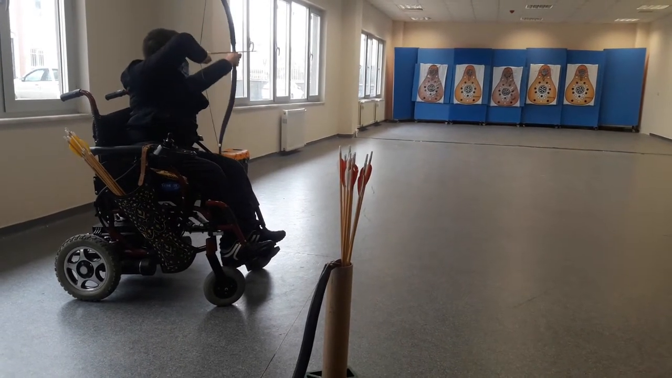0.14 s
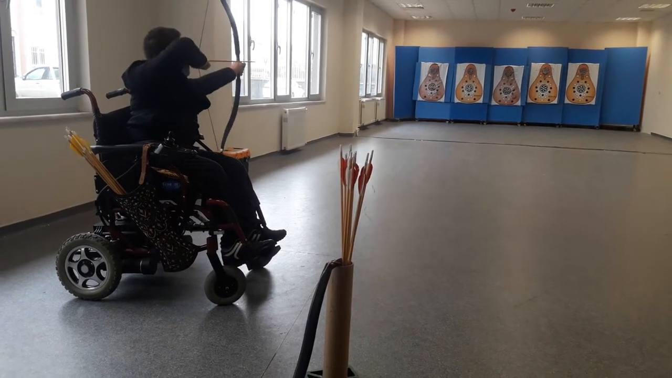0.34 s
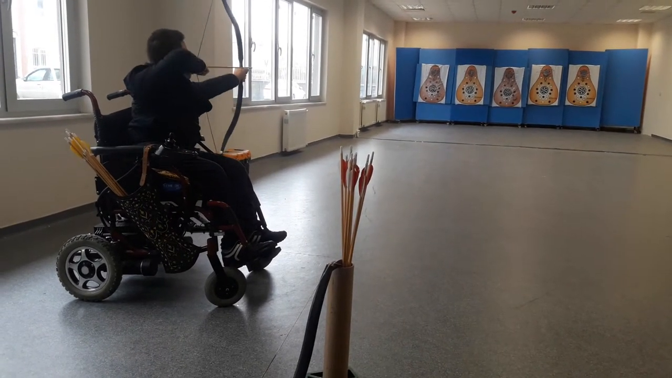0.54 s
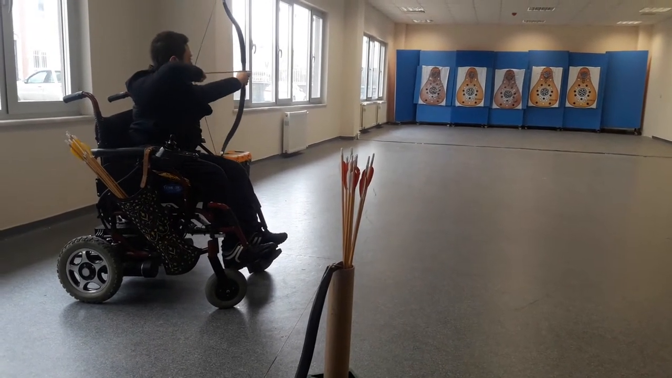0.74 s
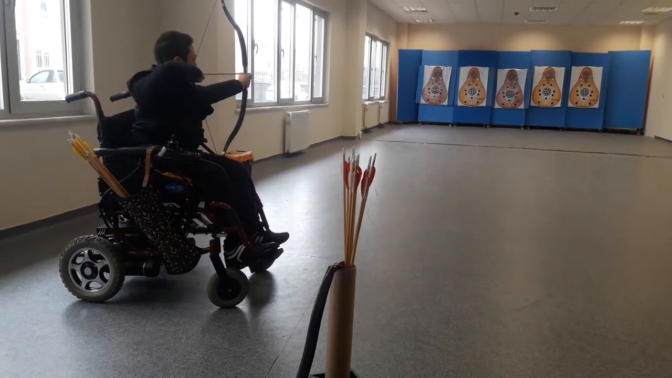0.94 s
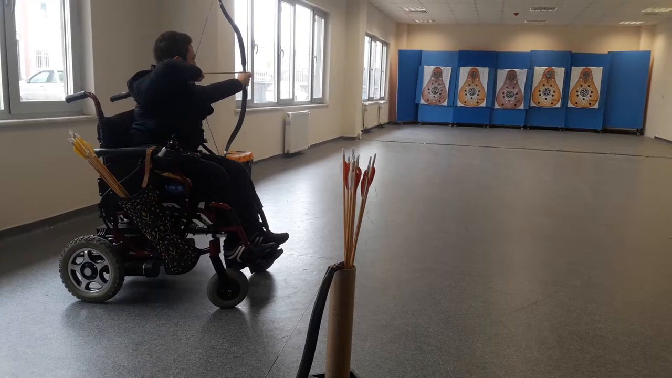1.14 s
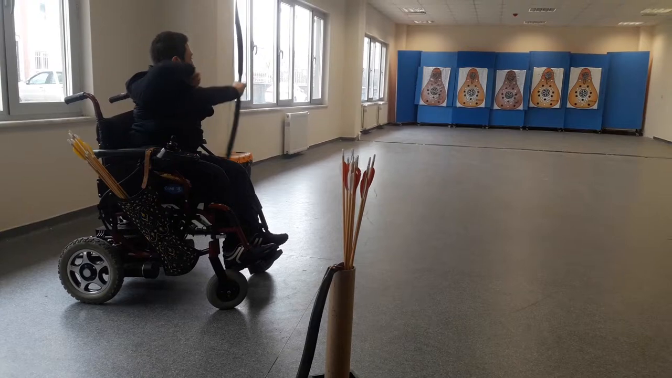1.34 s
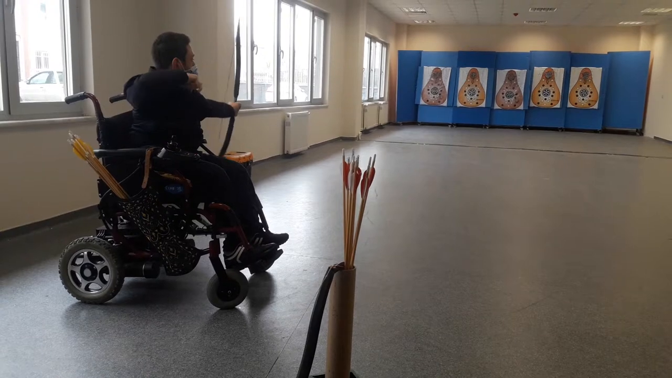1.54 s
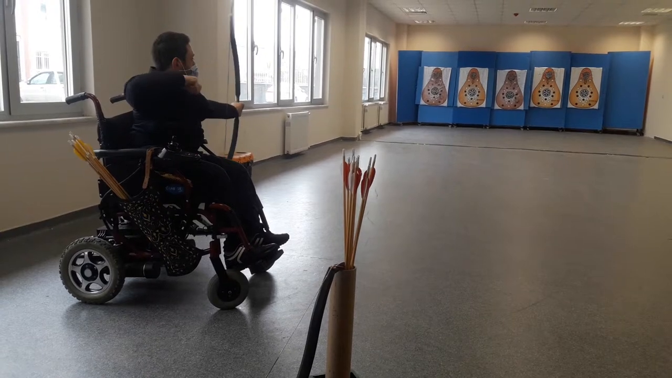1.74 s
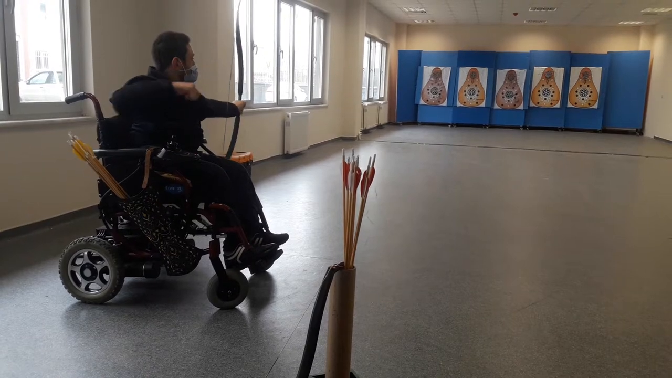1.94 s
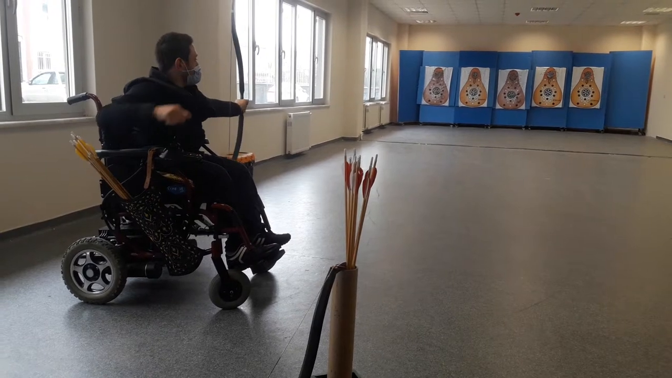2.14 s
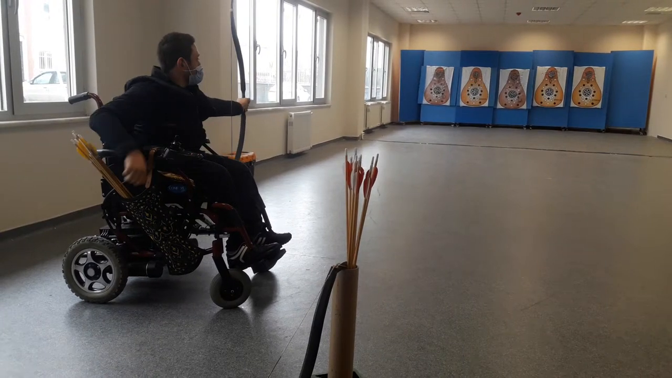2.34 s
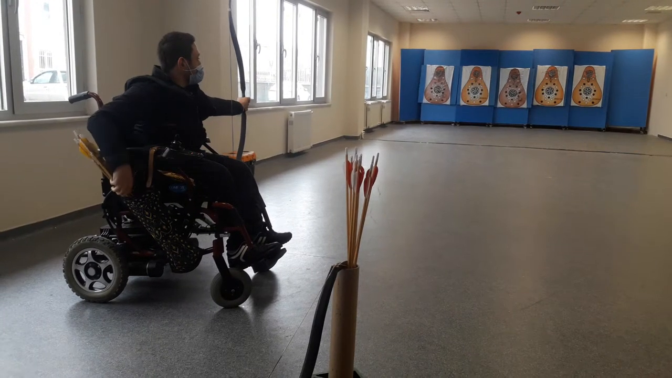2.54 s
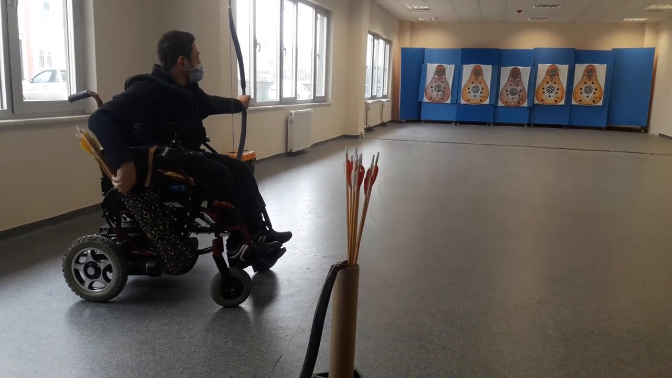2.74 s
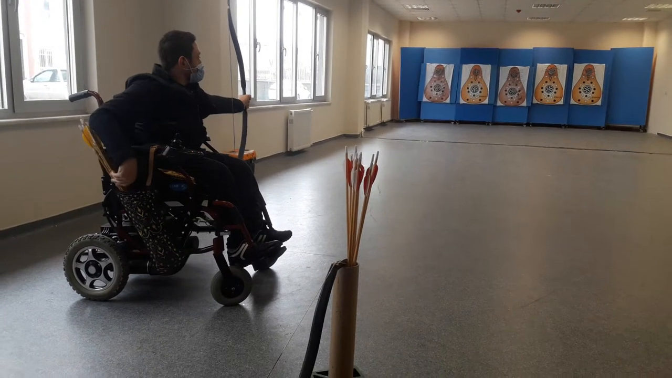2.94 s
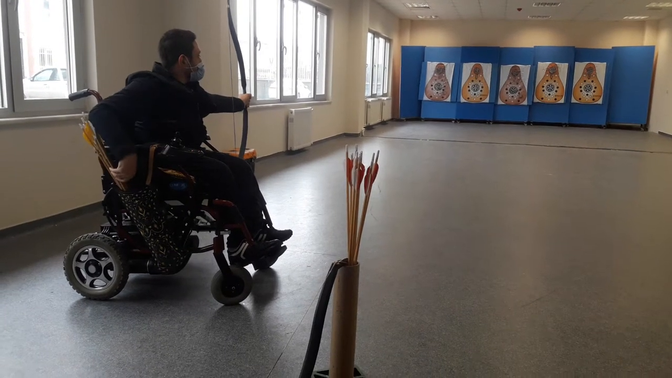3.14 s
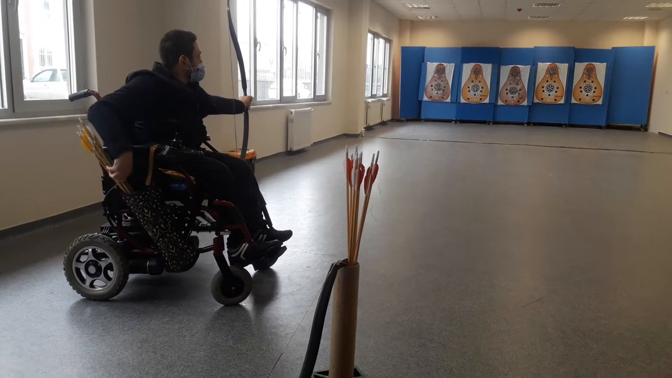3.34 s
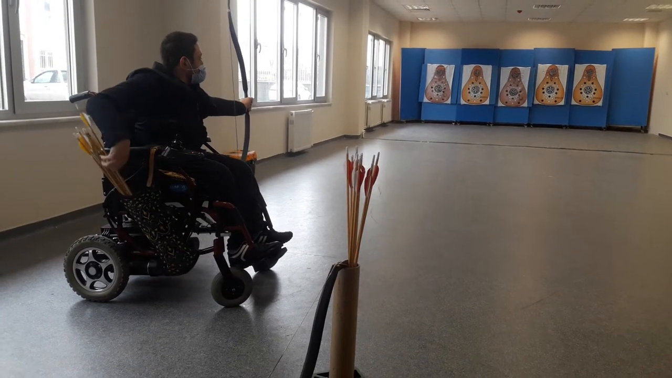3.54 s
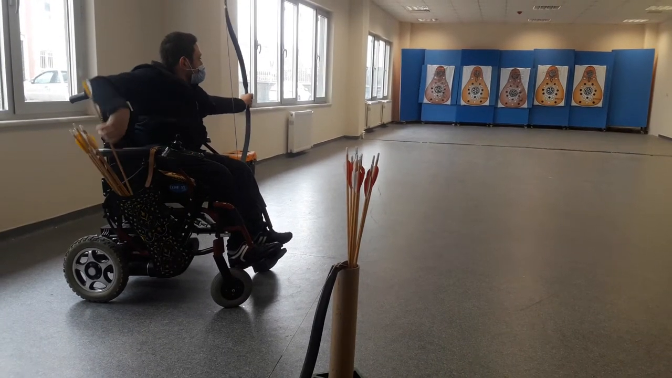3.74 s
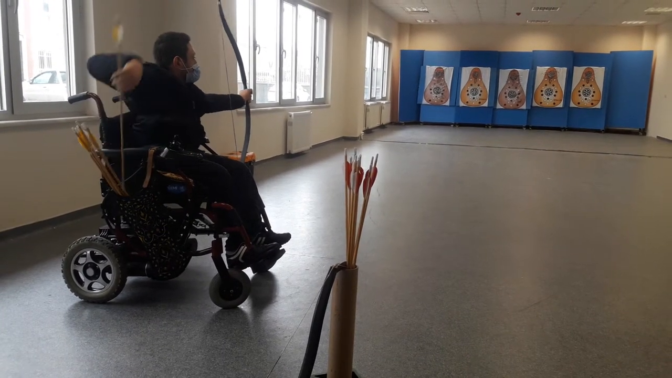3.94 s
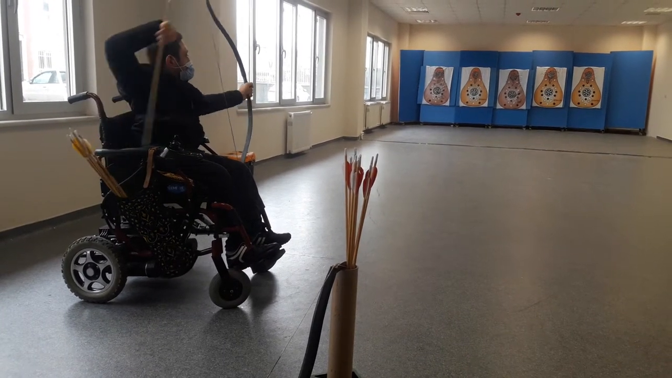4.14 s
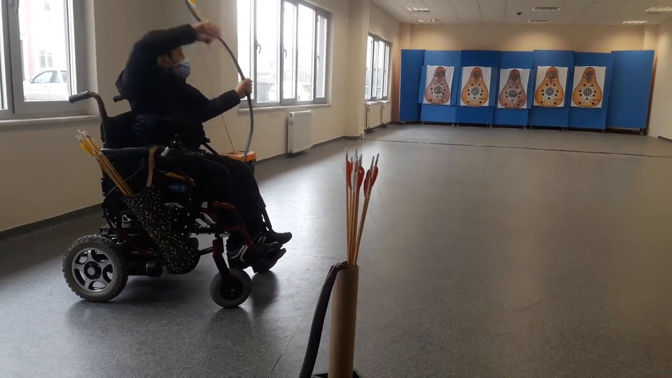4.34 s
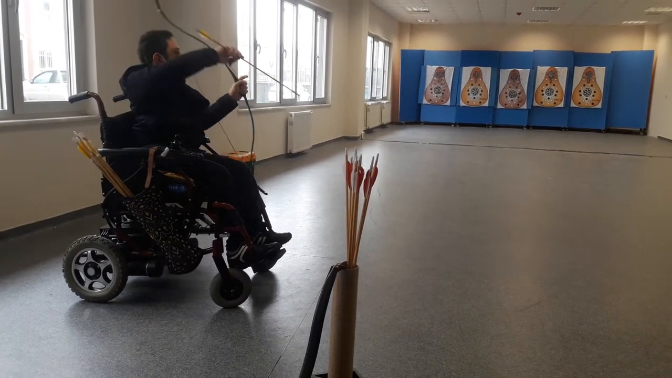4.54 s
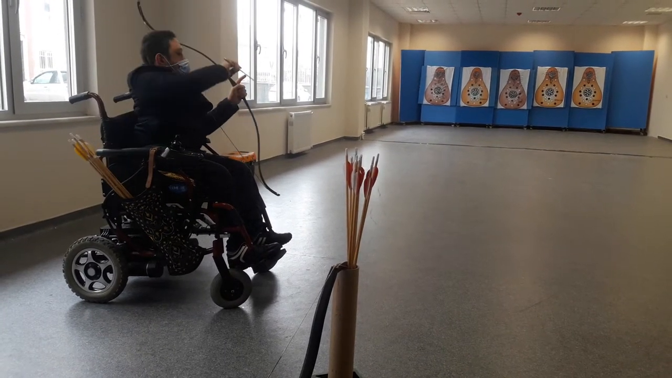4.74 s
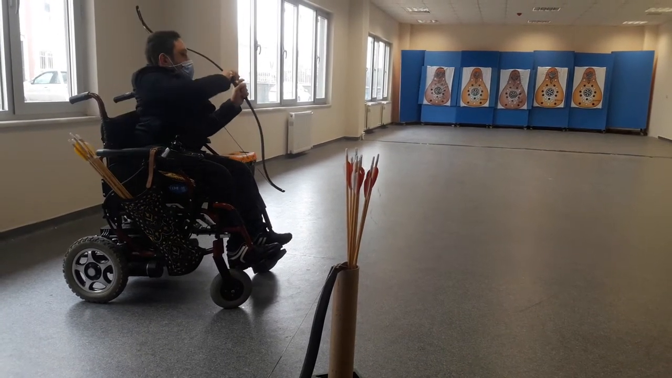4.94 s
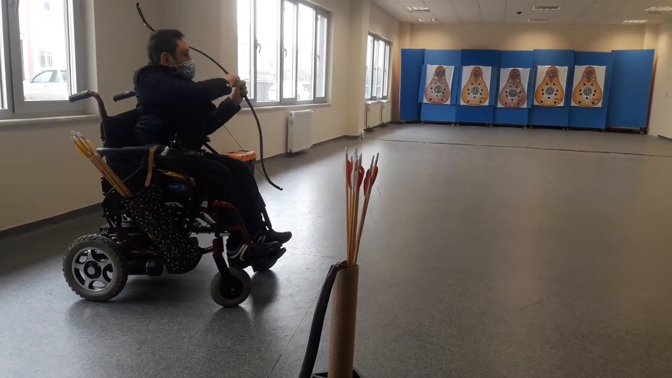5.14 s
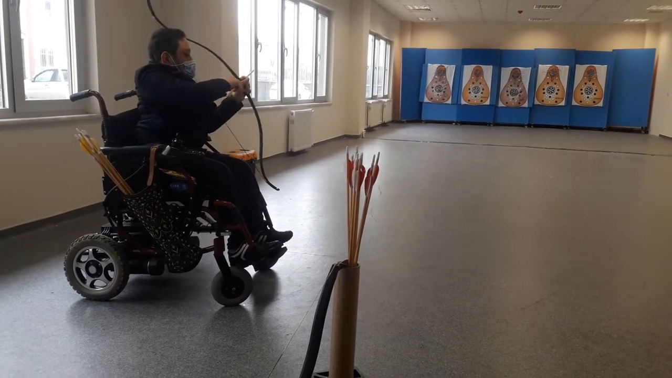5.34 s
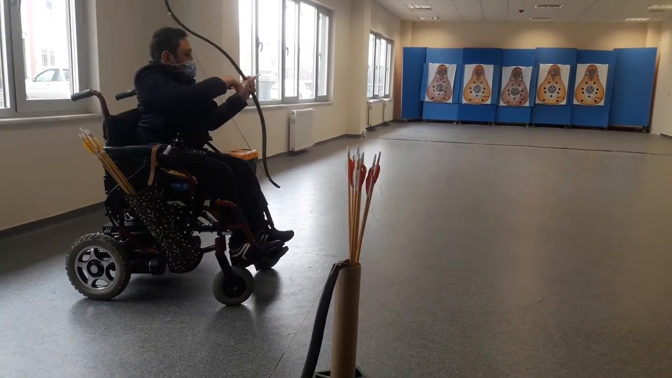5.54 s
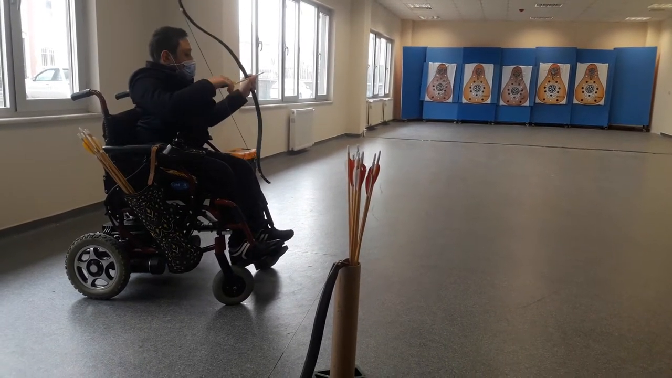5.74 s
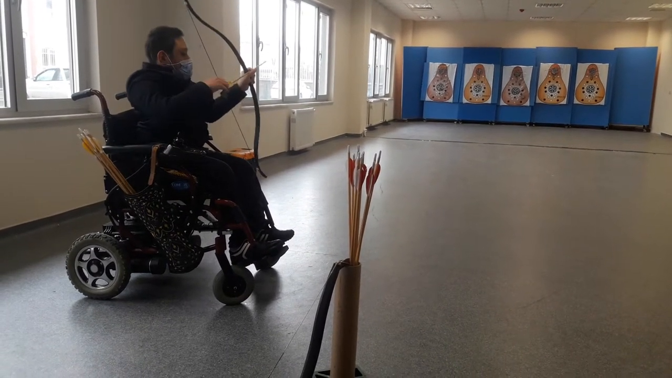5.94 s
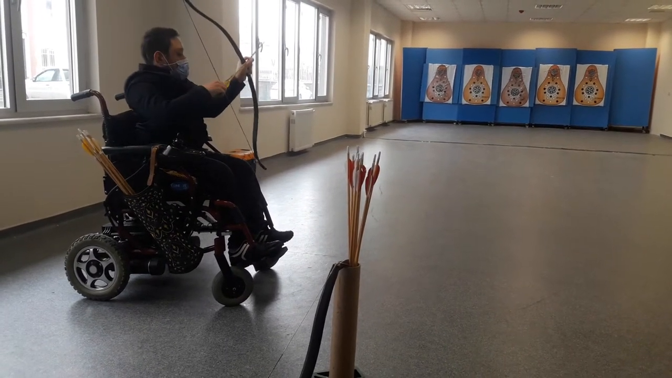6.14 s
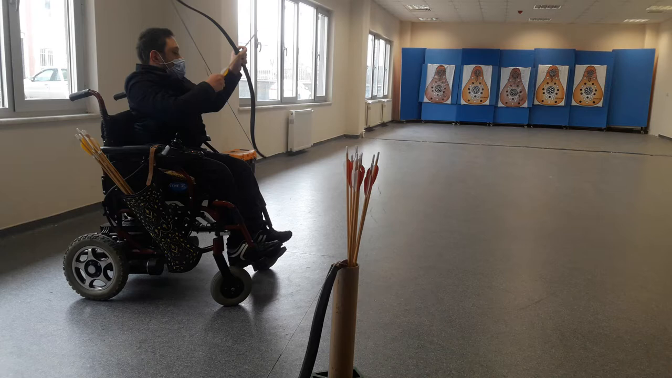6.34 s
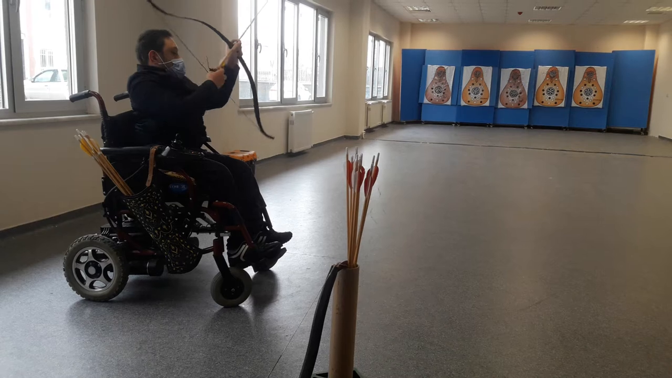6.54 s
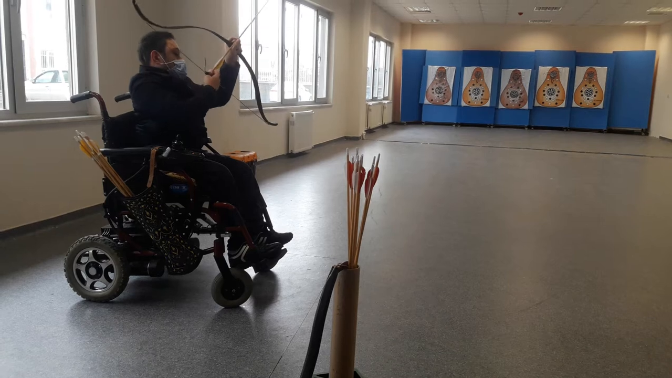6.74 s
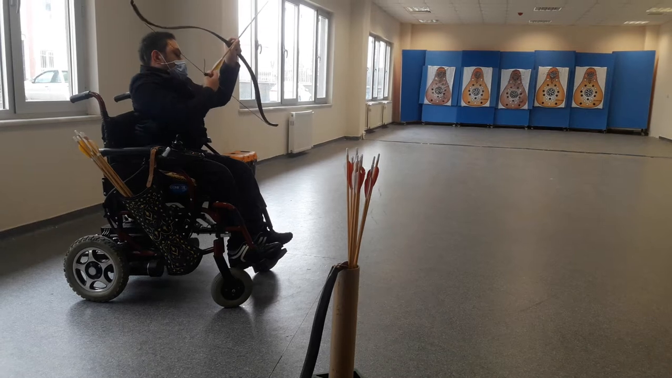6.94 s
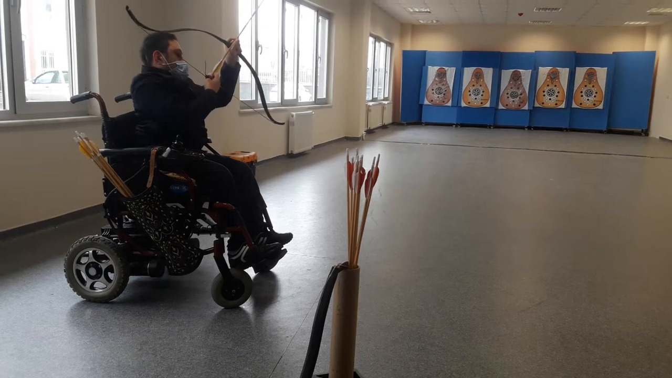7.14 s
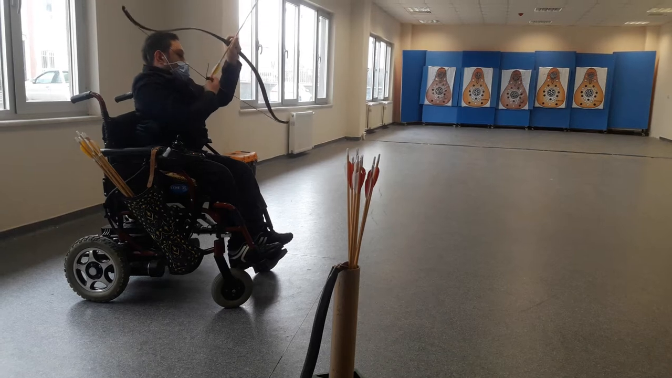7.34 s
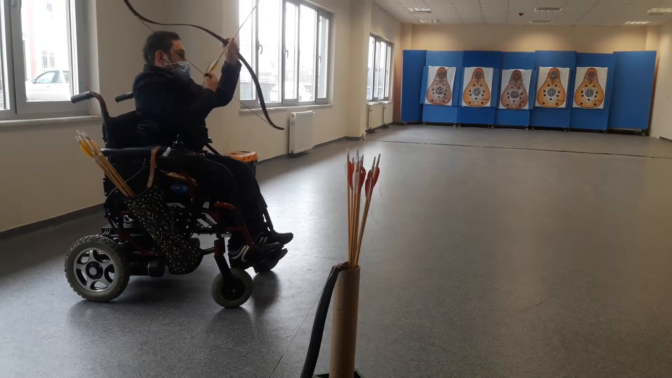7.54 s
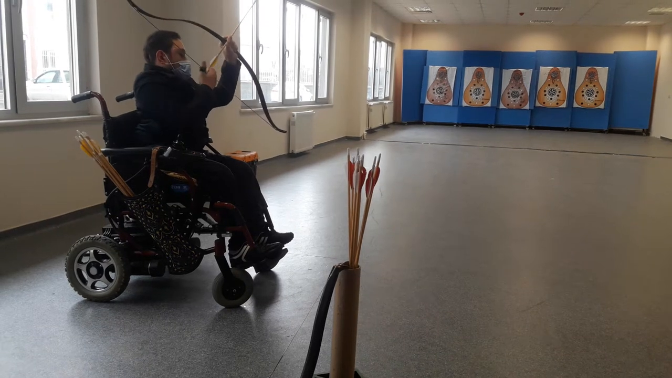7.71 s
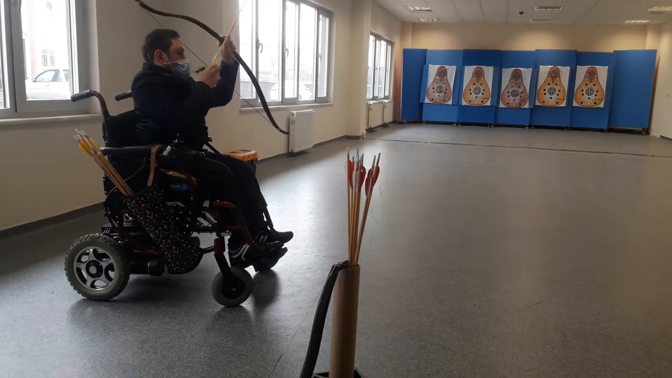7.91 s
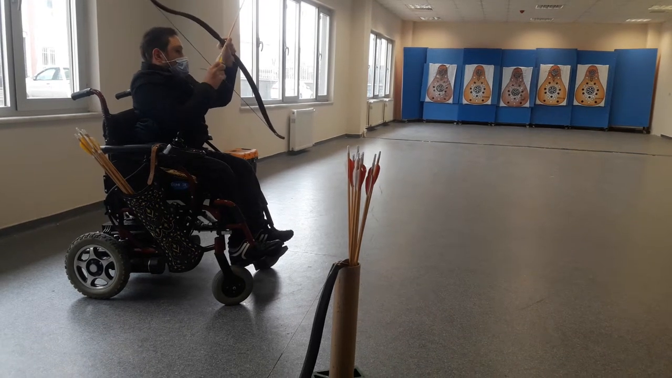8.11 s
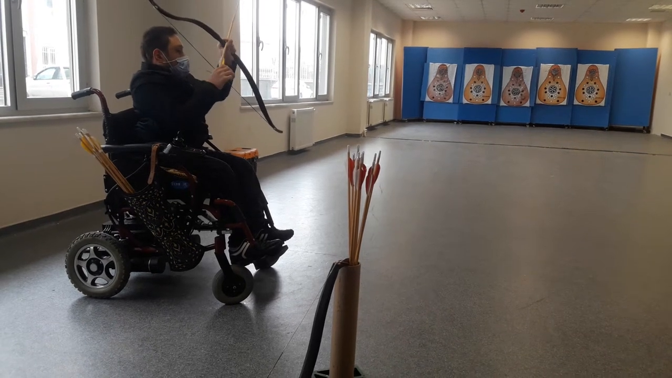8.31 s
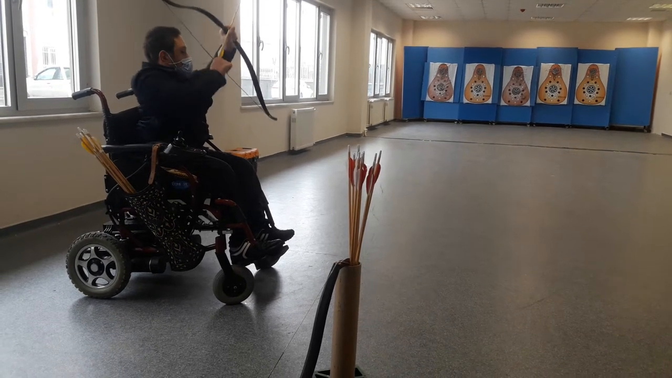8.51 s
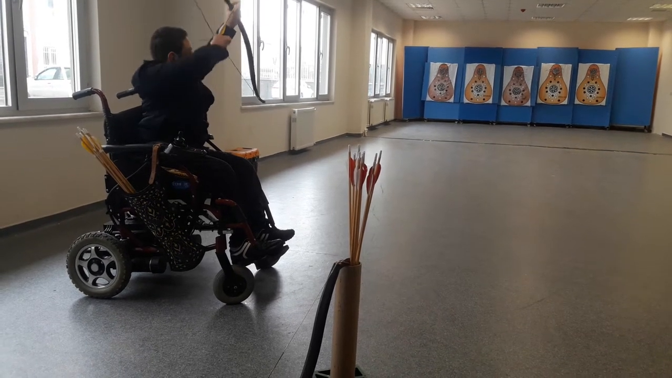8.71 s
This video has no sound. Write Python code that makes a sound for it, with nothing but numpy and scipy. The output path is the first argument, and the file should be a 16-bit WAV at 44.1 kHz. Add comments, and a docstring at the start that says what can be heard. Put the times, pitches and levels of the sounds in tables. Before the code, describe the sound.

A bowstring slaps close by and an arrow thuds into a distant target, twice, amid faint shaft clicks in a reverberant hall.

```python
"""First come a faint hum and the soft rustle of sleeves in a long, hard-walled hall. Then an archer shoots,
twice: the bowstring slaps home close by, and a third of a second later the arrow thuds into a far
target, which booms on. Around the shots, arrow shafts click and wood knocks. Each hit is a short burst
of noise plus the hall's echo, given the tone of the thing that was hit. Noise that swells and fades makes
the rustle, a dull wash of echo after the second thud, and a very faint whistle."""
import sys
import numpy as np
from scipy import signal
from scipy.fft import rfft, irfft, next_fast_len
from scipy.io import wavfile
from scipy.ndimage import uniform_filter1d, map_coordinates

SR = 44100
rng = np.random.default_rng(int(sys.argv[2]) if len(sys.argv) > 2 else 0)


def dump_mix(stems):
    """Bounce the given channels to the path in sys.argv[1] as a 16-bit WAV at rate SR."""
    frames = np.atleast_2d(stems).T  # one column per channel
    limited = np.clip(frames, -1, 1)  # hard clip at full scale
    pcm = np.round(limited * 32767).astype(np.int16)
    wavfile.write(sys.argv[1], SR, pcm)


N = 391166

# The string leaves the fingers, slaps home and rebounds. "Body" is the sound under about 1 kHz, "air" is
# over 8 kHz, "snap" is one resonance, and "ring" is how long a sound takes to fall by 60 dB.
# (time [s], level [dB], body [dB], air [dB], snap pitch [Hz], snap boost [dB], rise [s], ring [s])
STRING_HITS = [(1.335, -42, 4.5, 0.5, 1478, 7, 0.0034, .096), (1.350, -29.5, -3.5, 2, 2600, 6, .005, .06),
               (1.362, -24.5, -1, 1, 2590, 1.5, 0.0047, .064),
               (4.590, -39, 11, -12.5, 901, 10.5, 0.0085, .08), (4.604, -23, -5, 5, 6300, 3, 0.0045, .1),
               (4.620, -16.5, -0.5, 4, 6265, 7.5, 0.0025, 0.024),
               (4.635, -24.5, 0, 7.5, 5500, -2, .002, 0.042)]
# The tone of the bowstring (frequency [Hz], level [dB])
STRING_TONE = [(29, -53), (50, -15.5), (271, 0.5), (345, -6), (408, -6), (694, -10), (1270, -6),
               (1360, -7.5), (1540, -9), (1780, -5), (3950, -7.5), (6240, -6), (8140, -24), (11400, -21.5),
               (16000, -26.5)]
# Arrows land (time [s], level [dB], crack compared with the thud [dB], rise [s], ring [s])
ARROW_HITS = [(1.680, -12, -42.5, 0.0041, 0.057), (4.904, -11.5, -32, 0.002, .08)]
# The tone of each of the two targets (frequency [Hz], level [dB])
TARGET_TONES = [
    [(30, -51), (60, -26), (115, -1), (151, -11.5), (240, -3), (312, -4), (433, -13.5), (900, -9.5),
     (1300, -16), (2300, -21), (2600, -28), (4700, -31.5), (5300, -29), (5900, -34.5), (8130, -51.5),
     (16000, -64)],
    [(30, -48), (70, -19.5), (121, -12), (185, -4.5), (305, -5.5), (354, -9.5), (600, -10), (697, -15),
     (873, -9), (1750, -15.5), (2250, -33.5), (3800, -23.5), (5580, -26.5), (8130, -48), (16000, -54.5)],
]
# The bright crack of the arrow's point (frequency [Hz], level [dB])
CRACK_TONE = [(3000, -31.5), (8000, -7), (13500, 1.5), (16000, -4.5)]
# The low notes of each target (frequency [Hz], level compared with the thud [dB], ring [s])
TARGET_BOOMS = [
    [(76, -16, 1.4), (118.2, -2, 0.9), (310, -8.5, 0.36)],
    [(92, -14, 1), (198.5, -6.5, 0.82), (301.5, -7, 0.77)],
]
# Thin clicks of arrow shafts and their notched ends
# (time [s], level [dB], body [dB], air [dB], snap pitch [Hz], snap boost [dB], rise [s], ring [s])
SHAFT_HITS = [(2.2955, -53, -6.5, 0, 5470, -8, .001, 0.095), (2.33, -59.5, -15, 6, 7280, 8, .0008, 0.078),
              (2.3516, -43.5, -17, -4.5, 3650, 13, .0005, .029), (2.362, -47.5, -29, 1, 2120, 8, .003, .07),
              (2.505, -39, -4.5, 5.5, 4000, 7, .001, .018), (2.512, -36, -4, 5, 5770, 5.5, .0015, .04),
              (2.588, -42, -1.5, 0.5, 2600, 6.5, .001, 0.081), (3.095, -50, -13.5, 2, 4000, 14, .003, .033),
              (3.157, -56.5, -11, 7, 7100, 6, .003, .04), (3.195, -52, -10.5, -7, 3770, 6, .008, 0.063),
              (3.9, -52.5, 0.5, 3, 1100, 7, .006, .2), (4.406, -42, 4.5, 5, 5560, 7, .015, 0.2),
              (4.47, -54, -4, 4, 4100, 5.5, .005, .04), (6.123, -55, -2.5, -7, 6300, 9, .003, 0.15),
              (6.156, -55.5, -1, -2, 6330, 8, .0026, 0.055), (7.390, -53.5, -4, 10, 7060, 8.5, .0005, .04)]
# The tone of a shaft (frequency [Hz], level [dB])
SHAFT_TONE = [(120, -26.5), (400, 3.5), (1000, -3.5), (1350, -7), (1850, -3), (3200, -11.5), (4000, -8),
              (5000, -11), (5750, -6), (7300, -14), (8250, -26.5), (12600, -20.5), (16000, -26)]
# Fuller wooden knocks, farther off
# (time [s], level [dB], body [dB], air [dB], snap pitch [Hz], snap boost [dB], rise [s], ring [s])
WOOD_HITS = [(7.331, -36.5, 2.3, -1, 2400, 3.4, 0.0023, .06), (7.402, -54.5, 2.5, 8, 4200, 8, .0037, 0.053),
             (7.543, -36.5, 0.1, 2.5, 2650, 4, 0.0015, 0.067)]
# The tone of the knocked wood (frequency [Hz], level [dB])
WOOD_TONE = [(71, -38), (120, -22), (278, 0.5), (385, -9), (483, 0.5), (617, -14), (757, -4), (892, -6),
             (1980, -3.5), (2590, -2.5), (2810, -7), (4980, -7), (6910, -13), (7980, -37), (16000, -33)]
# Soft swells of noise. Most are cloth and arrow feathers rustling; the one at 5.392 s is a dull wash
# of hall echo lingering after the second thud.
# (swell ends [s], fade starts [s], hiss [dB], dull wash [dB], air compared with the hiss [dB])
SOFT_SWELLS = [(0.0, 0.157, -69.5, -72.5, -15), (0.222, 0.524, -69, -79, -11),
               (0.666, 0.97, -63, -64.5, -10), (3.1, 3.09, -47.5, -59.5, -15.5),
               (3.137, 3.216, -57, -63, -16), (3.43, 3.505, -58.5, -66, -14.5),
               (3.63, 3.85, -59, -56.5, -13), (3.91, 3.9, -52, -57, -13), (3.998, 4.16, -61, -69, -8.5),
               (5.392, 5.46, -63.5, -49.5, -5), (5.486, 5.69, -52, -63, -10),
               (6.268, 6.457, -67.5, -66, -13), (6.63, 6.856, -70.5, -60, -12),
               (8.268, 8.464, -71, -66.5, -18), (8.64, 8.87, -64.5, -63.5, -12.5)]
# The hiss of a swell (frequency [Hz], level [dB])
HISS_TONE = [(880, -42), (1500, -6.5), (1670, -2.5), (2170, 0), (2660, -5), (3690, -2.5), (4690, -5),
             (5300, -4), (6990, -7.5), (8500, -40), (11000, -61), (18700, -120)]
# The airy top of a swell (frequency [Hz], level [dB])
AIR_TONE = [(4410, -23.5), (7500, -2.5), (8250, -7), (13700, -0.5), (15100, -3.5), (16000, -8)]
# The dull wash of a swell (frequency [Hz], level [dB])
WASH_TONE = [(150, -22), (250, -3.5), (354, -1), (779, -7.5), (1030, -3), (1240, -5.5), (2360, -19),
             (2500, -12.5), (3250, -48.5), (5500, -120)]
# The hall's echo (frequency [Hz], ring [s], level [dB])
HALL_ECHO = [(60, 1.5, 2), (160, 0.91, -0.5), (420, 1.16, 0), (1100, 0.96, 1), (2860, 0.85, -0.5),
             (7160, 0.66, -3), (9000, 0.62, -6.5), (14000, 0.56, -4.5)]
# The murmur of air in the hall (frequency [Hz], level [dB])
MURMUR_TONE = [(20, -41.5), (40, -21), (70, -13), (123, -2.5), (285, -6), (590, -15.5), (1030, -12.5),
               (1440, -20.5), (1810, -19), (2820, -25.5), (4180, -28), (6540, -32.5), (8180, -40),
               (13900, -28.5), (16000, -34.5)]
# A faint whistle comes and goes (swell ends [s], fade starts [s], level [dB])
WHISTLE_SWELLS = [(2.753, 3.0, -71), (6.76, 6.85, -75), (8.154, 8.412, -74)]
# The whistle's narrow band near 4 kHz (frequency [Hz], level [dB])
WHISTLE_TONE = [(3300, -55), (3800, -1), (4000, 5), (4200, -4), (4700, -44)]

NEAR_RING_S, NEAR_DB = 0.26, 2  # the near walls answer briefly, a little louder than the far ones
SWELL_DB_PER_S, FADE_DB_PER_S = 109.5, 92  # how fast a swell comes and goes
FLUTTER_DB = 1.5  # how uneven the soft swells are
MURMUR_DB, MAINS_HZ, MAINS_DB = -60, 50, -73.5


def bowstring():
    """The string is let go and snaps home in a few quick hits."""
    return contacts(STRING_HITS, STRING_TONE, echo_db=1.6, build_s=0.0082, ripple_db=2.5)


def target_thuds():
    """The point cracks into a far target, heard mostly as echo; the target's backing booms on."""
    track, t = np.zeros(N), np.arange(2 * SR) / SR
    boom_rise = 1 - np.exp(-t / 0.0056)
    for (at, db, crack_db, rise, ring), tone, booms in zip(ARROW_HITS, TARGET_TONES, TARGET_BOOMS):
        thud = hit(rise, ring, lambda hz: curve(tone, hz), echo_db=9, build_s=0.017, ripple_db=1)
        crack = hit(.0005, .015, lambda hz: curve(CRACK_TONE, hz), echo_db=8, build_s=.006, ripple_db=-1)
        add(track, at, gain(db) * thud + gain(db + crack_db) * crack)
        for hz, boom_db, boom_ring in booms:
            fade = gain(db + boom_db - 60 * t / boom_ring)
            add(track, at, fade * boom_rise * np.sin(2 * np.pi * hz * t))
    return track


def shaft_clicks():
    """Thin arrow shafts tap together with light, bright clicks."""
    return contacts(SHAFT_HITS, SHAFT_TONE, echo_db=-0.3, build_s=0.01, ripple_db=2.5)


def wood_knocks():
    """Wood is knocked farther off, so the echo is stronger than the knock itself."""
    return contacts(WOOD_HITS, WOOD_TONE, echo_db=8, build_s=0.0016, ripple_db=3)


def contacts(hits, tone, echo_db, build_s, ripple_db):
    """One object is hit many times; each hit has its own mix of low and high, and its own snap."""
    track = np.zeros(N)
    for at, db, body_db, air_db, snap_hz, snap_db, rise, ring in hits:
        tilt = [(700, body_db), (1400, 0), (7000, 0), (8500, air_db)]

        def tone_db(hz):
            snap = snap_db * np.exp(-(np.log((hz + 1) / snap_hz) / 0.26) ** 2)
            return curve(tone, hz) + curve(tilt, hz) + snap

        add(track, at, gain(db) * hit(rise, ring, tone_db, echo_db, build_s, ripple_db))
    return track


def hit(rise_s, ring_s, tone_db, echo_db, build_s, ripple_db):
    """Rough contact makes a burst of noise and the hall answers; the first 50 ms have strength 1."""
    t = np.arange(SR // 4) / SR
    burst = rng.standard_normal(len(t)) * (1 - np.exp(-t / rise_s)) ** 2 * gain(-60 * t / ring_s)
    sound = gain(echo_db) * np.linalg.norm(burst) * hall_echo(build_s + rise_s)
    add(sound, 0, burst)
    ripples = rng.standard_normal(SR // 100)  # small resonances about 90 Hz apart, new for each hit
    sound = filtered(sound, lambda hz: tone_db(hz) + ripple_db * map_coordinates(ripples, [hz / 90]))
    return sound / np.std(sound[:SR // 20])


def rustle_and_wash():
    """Cloth and feathers rustle, and a dull wash of echo lingers after the second thud; all flutter."""
    start, end, hiss_db, wash_db, air_db = np.transpose(SOFT_SWELLS)
    hiss = swells(start, end, hiss_db) * patchy_noise(HISS_TONE, patchy_db=2.85)
    air = swells(start, end, hiss_db + air_db) * patchy_noise(AIR_TONE, patchy_db=-0.5)
    wash = swells(start, end, wash_db) * patchy_noise(WASH_TONE, patchy_db=2)
    return flutter(per_second=15) * (hiss + air) + flutter(per_second=12) * wash


def hall_echo(build_s):
    """The echo builds up, then dies away; the walls swallow the high notes soonest."""
    hz, t, noise = signal.stft(rng.standard_normal(3 * SR // 2), SR, nperseg=256)
    band_hz, ring_s, db = np.transpose(HALL_ECHO)
    far = gain(-60 * t / curve(np.c_[band_hz, ring_s], hz)[:, None])
    near = gain(NEAR_DB - 60 * t / NEAR_RING_S)
    tone = gain(curve(np.c_[band_hz, db], hz))[:, None]
    tail = signal.istft(noise * np.hypot(far, near) * tone, SR, nperseg=256)[1]
    build_up = 1 - np.exp(-np.arange(len(tail)) / SR / build_s)
    return tail * build_up / np.sqrt(SR / 20)


def background():
    """The hall's air murmurs, the mains electricity hums and a faint whistle comes and goes."""
    whistle = swells(*np.transpose(WHISTLE_SWELLS)) * patchy_noise(WHISTLE_TONE, patchy_db=-2.5)
    murmur = gain(MURMUR_DB) * patchy_noise(MURMUR_TONE, patchy_db=2.3)
    mains = gain(MAINS_DB) * np.sin(2 * np.pi * MAINS_HZ * np.arange(N) / SR)
    return murmur + mains + whistle


def swells(start, end, db):
    """The loudness of sounds that swell, hold and fade; where they overlap, their powers add."""
    t = np.arange(0, N, 64)[:, None] / SR
    loss_db = SWELL_DB_PER_S * np.maximum(start - t, 0) + FADE_DB_PER_S * np.maximum(t - end, 0)
    return np.interp(np.arange(N) / SR, t[:, 0], np.linalg.norm(gain(db - loss_db), axis=1))


def flutter(per_second):
    """A loudness that glides from one random value to the next."""
    points = rng.standard_normal(int(N * per_second / SR) + 4)
    return gain(FLUTTER_DB * map_coordinates(points, [np.arange(N) * per_second / SR]))


def patchy_noise(tone, patchy_db):
    """Noise of strength 1, with louder and softer patches scattered over pitch and time."""
    noise = signal.stft(rng.standard_normal(N), nperseg=512)[2]
    patches = uniform_filter1d(rng.standard_normal(noise.shape), size=6, axis=0)  # smooth over pitch
    patches = uniform_filter1d(patches, size=10, axis=1)  # and over time
    uneven = signal.istft(noise * gain(patchy_db * normalised(patches)), nperseg=512)[1][:N]
    return normalised(filtered(uneven, lambda hz: curve(tone, hz)))


def filtered(sound, tone_db):
    """Turns each frequency up or down by tone_db(frequency)."""
    size = next_fast_len(len(sound) + SR // 4)
    db = np.maximum(tone_db(np.fft.rfftfreq(size, 1 / SR)), -100)
    cepstrum = irfft(np.log(gain(db)), size)
    # Folding this onto its first half makes the filter ring only after a hit, never before it.
    cepstrum[1:size // 2] *= 2
    cepstrum[size // 2 + 1:] = 0
    return irfft(rfft(sound, size) * np.exp(rfft(cepstrum)), size)[:len(sound)]


def curve(points, hz):
    """Reads between (frequency, value) points, giving each octave about the same width."""
    point_hz, values = np.transpose(points)
    return np.interp(np.log(hz + 1), np.log(point_hz + 1), values)


def gain(db):
    """Turns decibels into a number to multiply by."""
    return 10 ** (np.asarray(db) / 20)


def normalised(x):
    """Scales a signal to an average strength (rms) of 1."""
    return x / np.sqrt(np.mean(x ** 2) + 1e-20)


def add(track, at_s, sound):
    """Mixes a sound into the track at the given time."""
    part = track[round(at_s * SR):][:len(sound)]
    part += sound[:len(part)]


def scene():
    """The shots, the handling of arrows and the hall's hum, together in one channel."""
    bow = bowstring()
    handling = shaft_clicks() + wood_knocks()
    return (bow + target_thuds() + handling + rustle_and_wash() + background())[None]


def record(dry):
    """Rounds off the loudest peaks, shifts the wave slightly off zero and cuts the highest treble."""
    ceiling, offset, top_hz = 0.88, -0.0005, 15870
    soft = dry / (1 + np.abs(dry / ceiling) ** 6) ** (1 / 6) + offset
    return irfft(rfft(soft) * (np.fft.rfftfreq(N, 1 / SR) < top_hz), N)


dry = scene()
out = record(dry)
dump_mix(out)
```